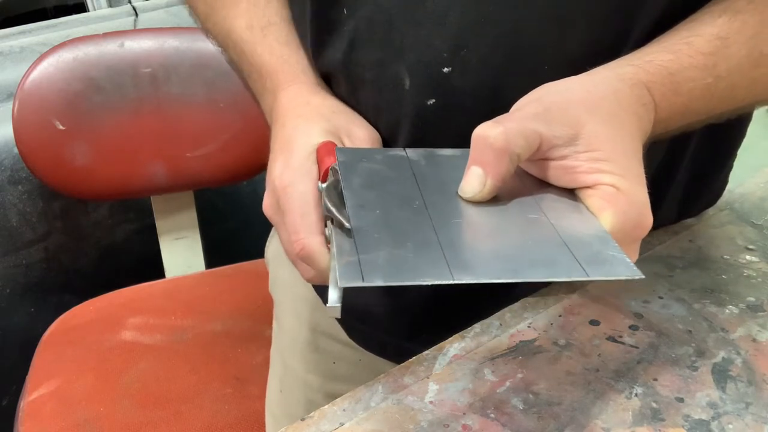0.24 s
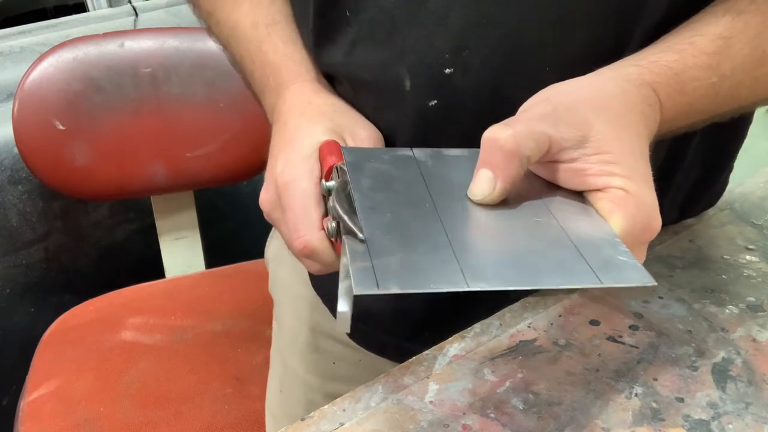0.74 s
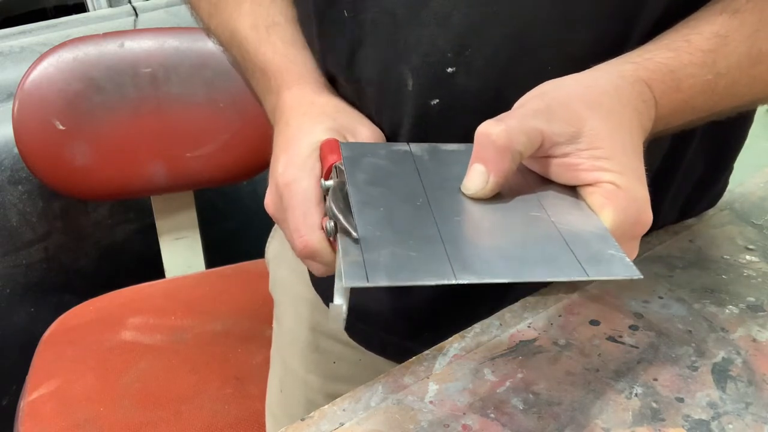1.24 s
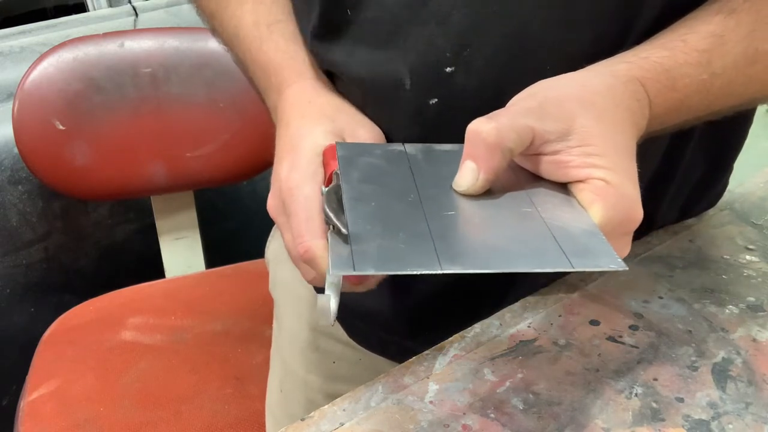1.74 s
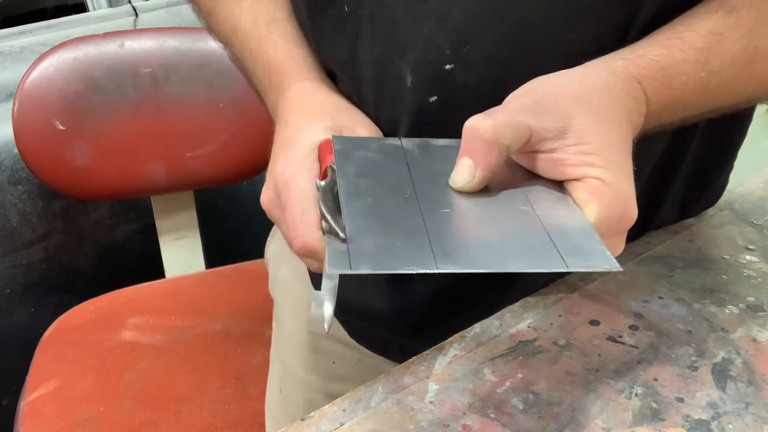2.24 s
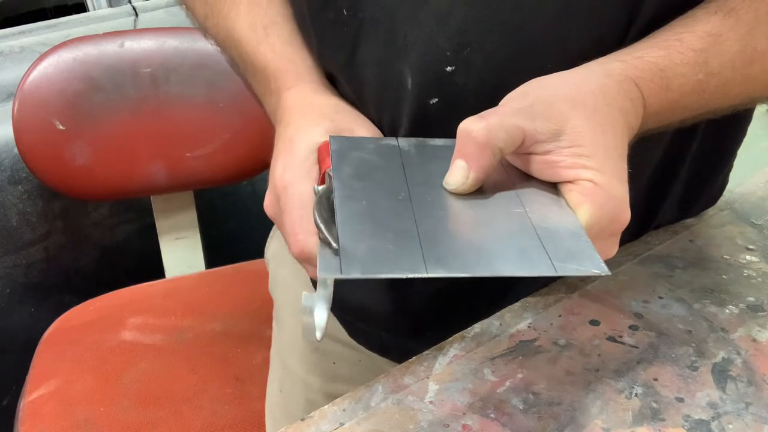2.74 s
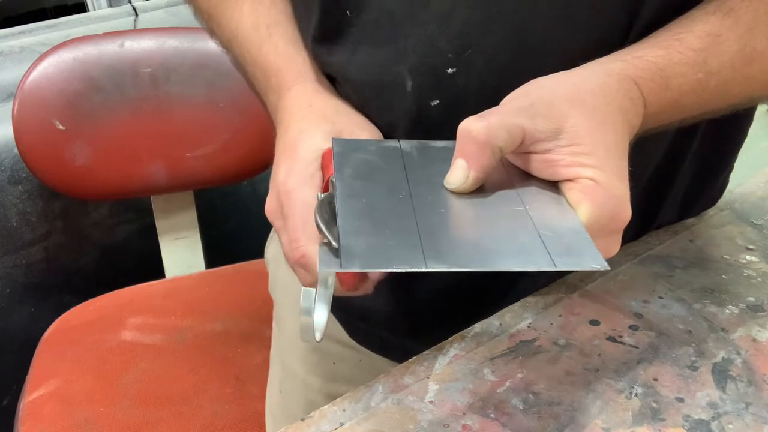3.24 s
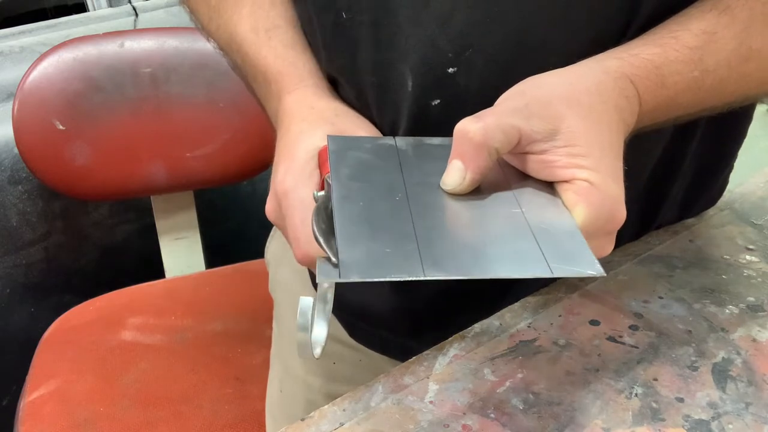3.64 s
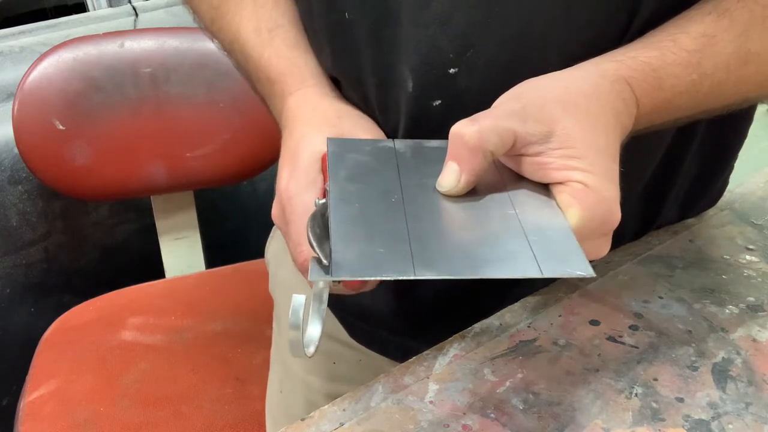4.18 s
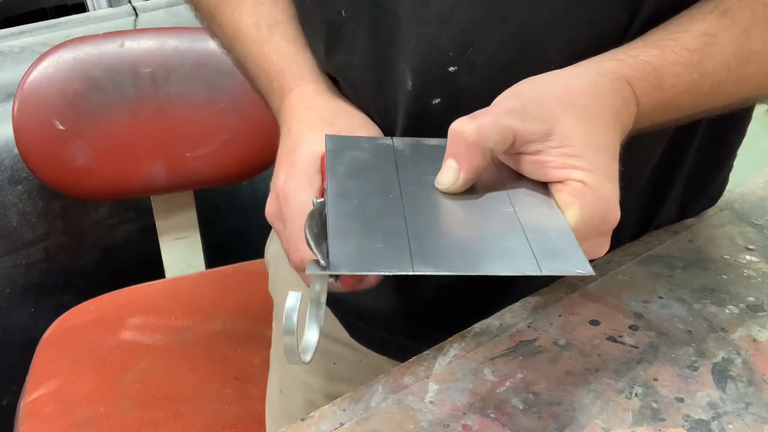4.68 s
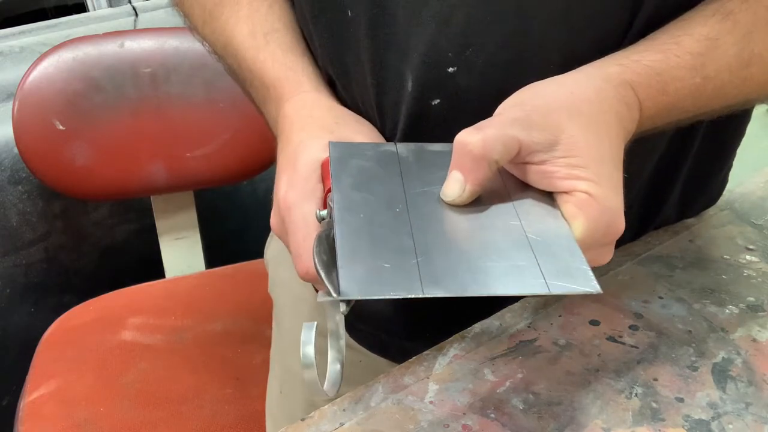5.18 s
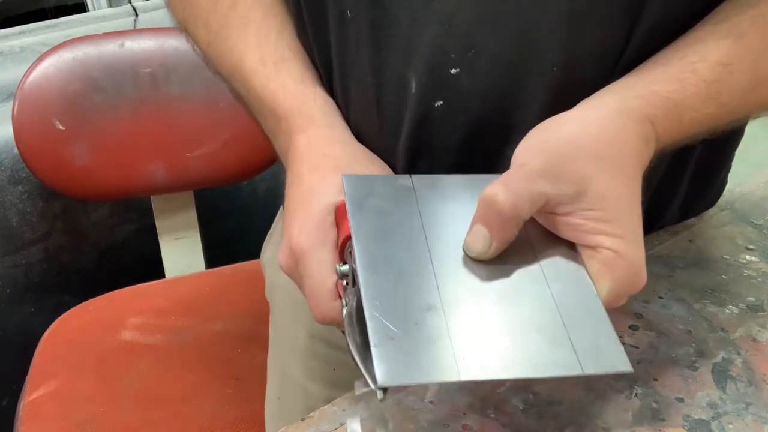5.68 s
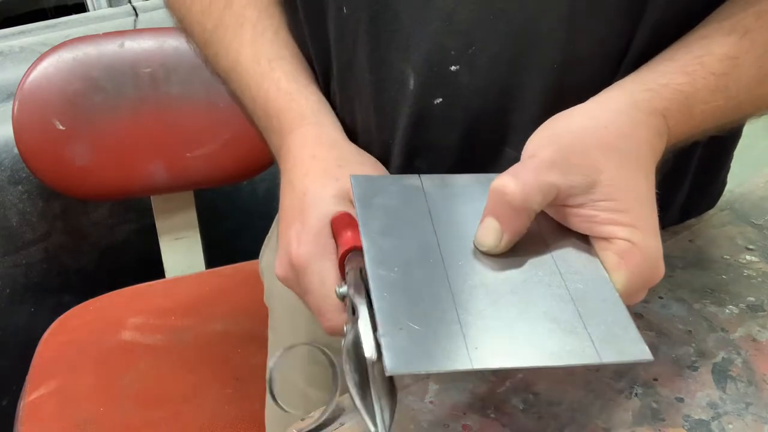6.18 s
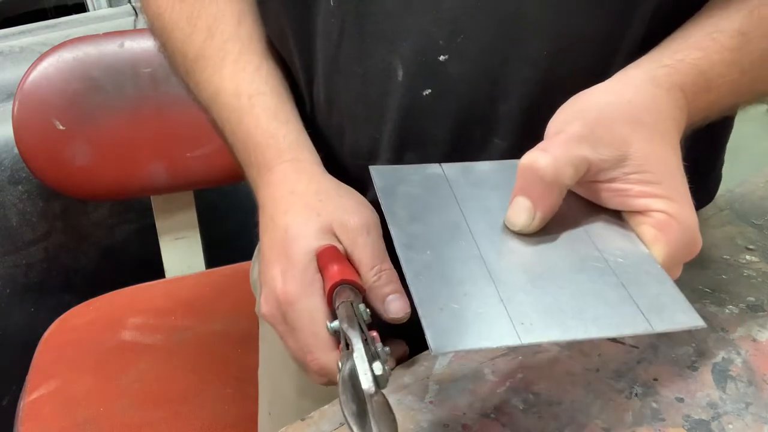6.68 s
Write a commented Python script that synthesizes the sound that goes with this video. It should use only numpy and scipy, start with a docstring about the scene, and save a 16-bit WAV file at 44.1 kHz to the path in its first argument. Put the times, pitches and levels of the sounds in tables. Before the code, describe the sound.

Close stereo microphone, small lively shop with a short reverberation and faint ventilation and machine hum. Regular snipping of sheet metal: a small bite, a crunchy rasping hiss with a thin high squeal, a hard jaw clack, and a fast stuttering scrape along the edge. The final stroke snaps hard; then the freed sheet and curled offcut rub and tap lightly before only the hum remains.

```python
"""A humming workshop, hand snips cutting a strip off a steel sheet close to a two-port microphone.
Each stroke: the blades bite with a tick and shear with a gritty hiss, the jaws rub open and clack,
then judder forward along the cut edge and shake the sheet. The last stroke ends in a loud snap,
then the freed sheet scuffs and taps. Shaped random fractures make the hiss and grind, short noise bursts
the ticks and cracks, decaying modes the ringing; reflections and a tail place the work in the shop."""
import sys
import numpy as np
from scipy import signal
from scipy.fft import rfft, irfft, next_fast_len
from scipy.io import wavfile
from scipy.ndimage import uniform_filter1d

SR = 44100
rng = np.random.default_rng(int(sys.argv[2]) if len(sys.argv) > 2 else 0)


def store_pcm(level_fs):
    """Save levels as 16-bit WAV."""
    pcm = np.round(np.clip(level_fs, -1, 1) * 32767).astype(np.int16)
    wavfile.write(sys.argv[1], SR, np.atleast_2d(pcm).T)


N = 305172
TIME = np.arange(N) / SR  # seconds
# Levels in the tables are relative: each function trims its layers, and the room and recorder follow.


def amp(db):
    """Decibels to gain."""
    return 10 ** (np.asarray(db) / 20)


def unit(x):
    """Scales to rms 1."""
    return x / np.sqrt(np.mean(x ** 2) + 1e-20)


def read(points, hz):
    """Reads a table of (Hz, value) on a log-frequency axis."""
    f, value = np.transpose(points)
    return np.interp(np.log(hz + 1), np.log(f + 1), value)


def add(mix, s, sound):
    """Mixes a sound in at time s, in seconds."""
    part = mix[max(round(s * SR), 0):][:len(sound)]
    part += sound[:len(part)]


def colour(x, spectrum, size=2048):
    """Causal minimum-phase filter of unit energy with the given spectrum."""
    log_gain = np.log(amp(read(spectrum, abs(np.fft.fftfreq(size, 1 / SR)))))
    taps = np.fft.ifft(np.exp(np.conj(signal.hilbert(log_gain)))).real[:size // 2]
    return signal.oaconvolve(x, taps / np.linalg.norm(taps))[:len(x)]


def drift(rate):
    """Smooth random motion of rms 1: noise under a Gaussian low-pass of the given rate in Hz."""
    hz = np.fft.rfftfreq(N, 1 / SR)
    return unit(irfft(rfft(rng.standard_normal(N)) * np.exp(-(hz / rate) ** 2), N))


def resonate(x, hz, width_hz):
    """A resonance that follows the curve hz: shift down, smooth, shift back up."""
    turn = np.exp(2j * np.pi * np.cumsum(hz) / SR)
    r = np.exp(-np.pi * width_hz / SR)
    return unit((turn * signal.lfilter([1 - r], [1, -r], x / turn)).real)


def grit(per_s, spread_db):
    """Tiny fractures at random moments, their sizes scattered by an exponential draw in dB."""
    size = amp(spread_db * np.minimum(rng.exponential(1, N), 4))
    return unit(size * rng.choice([-1, 1], N) * (rng.random(N) < per_s / SR))


def pings(per_s, ring_s, glide, size=560, count=14000):
    """Micro-slips along the blade: each sings for a few milliseconds at its own gliding pitch."""
    where, pitch, bend, keep = rng.random((count, 4)).T
    live = keep < per_s * N / SR / count
    t = np.arange(size) / SR
    hz = (2000 + 14000 * pitch[live, None]) * (1 + glide * (bend[live, None] - .5) * t / t[-1])
    waves = t * np.exp(-t / ring_s) * np.sin((2 * np.pi * hz * t).astype(np.float32))
    at = (where[live, None] * N).astype(int) + np.arange(size)
    return unit(np.bincount(at.ravel(), waves.ravel(), N)[:N])


def contacts(times, levels_db, rise, decay, size=1024):
    """Metal meets metal: a burst of micro-impacts; rise and decay are time constants in seconds."""
    out, t = np.zeros(N), np.arange(size) / SR
    shape = (1 - np.exp(-t / rise)) * np.exp(-t / decay)
    for s, db in zip(times, levels_db):
        burst = shape * rng.standard_normal(size)
        add(out, s, amp(db) * unit(burst) * np.sqrt(SR * decay / size))
    return out


def ringing(times, levels_db, modes, scatter_db, detune, rise, tilt_db=0, wander=0, size=6144):
    """Each blow rings the modes a little differently; the balance gains tilt_db an octave over the scene."""
    out, t = np.zeros(N), np.arange(size) / SR
    hz, mode_db, t60 = np.transpose(modes)[:, :, None]
    grip = rng.random(hz.shape)
    for s, db in zip(times, levels_db):
        strength, shift, phase = rng.standard_normal((len(modes), 3)).T[:, :, None]
        tilt = tilt_db * (s * SR / N - .5) * np.log2(hz / hz.mean())
        weight = amp(mode_db + scatter_db * strength + tilt)
        # grip and slot change from stroke to stroke and pull each mode its own way
        pitch = hz * (1 + detune * shift + wander * np.sin(2 * s + 2 * np.pi * grip))
        waves = np.sin(2 * np.pi * (pitch * t + phase)) * np.exp(-np.log(1000) * t / t60)
        blow = (weight * waves).sum(0) / np.linalg.norm(weight)
        add(out, s, amp(db) * blow * (1 - np.exp(-t / rise)))
    return out


# Likeness of diffuse sound at the two ports. Each row: frequency in Hz, likeness from 0 to 1.
LIKENESS = [(60, 0.83), (150, 0.83), (300, 0.74), (700, 0.08), (3000, 0), (4500, 0.06), (6300, 0.1),
            (7500, 1), (9500, 0.98), (14000, 0.7)]
# Microphone ports, for all sound but the machine hum and the low bumps.
# Each row: frequency in Hz, left's phase lead in radians.
PORT_LEAD = [(1000, .1), (2100, .9), (2700, 2.6), (3400, 2.3), (4000, 1.2), (4700, 1.6), (5500, 2.6),
             (7500, .1), (8400, -1), (9500, -3.1), (11300, -6.3), (13200, -9.4), (14700, -12.5),
             (16000, -13.6)]


def diffuse(a, b, hz):
    """Two unrelated spectra become the partly alike pair that the ports pick up."""
    same = np.clip(read(LIKENESS, hz), 0, 1)
    left = a * np.exp(1j * read(PORT_LEAD, hz))
    return np.array([left, same * a + np.sqrt(1 - same ** 2) * b])


# Spectrum of the ventilation noise. Each row: frequency in Hz, relative level in dB.
AIR_SPECTRUM = [(15, -63), (24, -33), (40, -14.5), (100, -5), (170, -14), (250, -15.5), (310, -17.5),
                (400, -15), (520, -25), (800, -26.5), (1300, -28), (2000, -37), (5700, -43.5), (12000, -48),
                (16000, -53)]
# Machinery hum. Each row: frequency in Hz, relative level in dB.
HUM_TONES = [(47.3, -56), (71, -60), (94.6, -51.5), (118, -56), (172, -67)]


def background(air_db=-46.0, hum_db=-.5, waver=0.5):
    """Ventilation noise and the hum of a machine, whose tones waver in level and phase."""
    hz = np.fft.rfftfreq(N, 1 / SR)
    pair = diffuse(*rfft(rng.standard_normal((2, N))), hz)
    air = irfft(pair * amp(read(AIR_SPECTRUM, hz)), N)
    hum = np.zeros(N)
    for f, db in HUM_TONES:
        strength = amp(db + hum_db) * np.sqrt(2) * (1 + waver * drift(rate=4.5))
        hum += strength * np.sin(2 * np.pi * f * TIME + 0.53 * drift(rate=1.2))
    return (amp(air_db) * unit(air) + hum) * amp([[-.7], [.7]])  # left a little softer than right


def reflections(t60s, delay, size=32768):
    """A two-channel noise tail of unit energy, each band dying at its own speed."""
    hz, t, z = signal.stft(rng.standard_normal((2, size)), SR, nperseg=128)
    decay = np.exp(-np.log(1000) * t / read(t60s, hz)[:, None])
    tail = signal.istft(z * decay, SR, nperseg=128)[1]
    tail[:, :round(delay * SR)] = 0
    return tail / np.linalg.norm(tail, axis=1, keepdims=True)


# Balance of the ports. Each row: frequency in Hz, left over right in dB.
PORT_BALANCE = [(300, 3.5), (1200, 2), (3000, -0.5), (5200, 3), (7000, 0)]
# Reflections off bench and sheet. Each row: frequency in Hz, relative level in dB.
NEAR_SPECTRUM = [(200, -20), (600, -3.5), (1400, 0), (2100, -2), (3000, -6), (4600, -3), (7500, -5),
                 (14000, -7.5)]
# Workshop reverberation. Each row: frequency in Hz, time to fall 60 dB in seconds.
SHOP_T60 = [(300, 0.06), (1500, 0.5), (5000, 0.45), (10000, 0.31), (15000, 0.081)]


def space(x, near_db=-1, shop_db=-14):
    """Direct sound at the two ports, quick reflections off the work, and the workshop's tail."""
    size = next_fast_len(N + SR)
    hz = np.fft.rfftfreq(size, 1 / SR)
    direct = np.array([np.exp(1j * read(PORT_LEAD, hz)), np.ones(len(hz))])
    near_tail = reflections([(1000, .028)], delay=.0006)  # dies 60 dB in 28 ms at every frequency
    near = amp(near_db + read(NEAR_SPECTRUM, hz)) * rfft(near_tail, size)
    shop = amp(shop_db) * rfft(reflections(SHOP_T60, delay=0.0091), size)
    balance = amp(np.outer([.5, -.5], read(PORT_BALANCE, hz)))
    return irfft(rfft(x, size) * (direct + diffuse(*(near + shop), hz)) * balance, size)[:, :N]


# Soft low knocks of the hands. Each row: centre in seconds, level in dB, pitch in Hz, half-length in seconds.
HAND_BUMPS = [(2.439, -36.5, 71.5, 0.024), (6.322, -18, 99, 0.007), (6.361, -29.5, 114, 0.015)]


def bumps():
    """The hands shift their grip and settle with a dull, low push: a sine under a Gaussian swell."""
    out = np.zeros(N)
    for s, db, hz, width in HAND_BUMPS:
        t = TIME - s
        out -= amp(db) * np.exp(-(t / width) ** 2 / 2) * np.sin(2 * np.pi * hz * t)
    return out


# The freed sheet scuffs on hand and tool. Each row: start in seconds, length in seconds,
# rub level in dB, ring of the sheet in dB.
SHEET_SCUFFS = [(5.765, 0.22, -48.5, -62), (5.885, 0.15, -43, -59), (5.985, 0.11, -40, -42),
                (6.183, 0.17, -54, -54), (6.563, 0.14, -59.5, -80), (6.816, 0.084, -73, -51)]
# Light taps of the loose offcut landing on the lap, and of the sheet in the hand. Each row: start in seconds,
# tick level in dB, ring level in dB, ring pitch in Hz.
OFFCUT_TAPS = [(5.775, -24, -31, 986), (5.912, -32, -29.5, 1900), (5.943, -51, -29, 4430),
               (5.991, -26.5, -31, 2210), (6.003, -32, -23.5, 3230), (6.015, -26.5, -30, 1970),
               (6.027, -32, -23, 2620), (6.2, -49, -40, 1320), (6.234, -45, -34.5, 2460),
               (6.268, -51, -37, 1240), (6.287, -54, -45, 2910), (6.825, -55.5, -35, 1344)]
# Modes of the hand-damped sheet, also shaken by judder().
# Each row: frequency in Hz, relative level in dB, time to fall 60 dB in seconds.
SHEET_MODES = [(434, -9.5, 0.051), (677, -7.5, 0.12), (780, -10.5, 0.043), (942, -18, 0.05),
               (1055, -10.5, 0.039), (1157, -6.5, 0.05), (1240, -4, 0.022), (1395, 5, 0.032),
               (1526, 0, 0.094), (1600, -5.5, 0.034), (1890, -15, 0.031), (2090, -16, 0.023),
               (2510, -12, 0.013)]
# Spectrum of rubbing steel, also in judder(). Each row: frequency in Hz, relative level in dB.
RUB_SPECTRUM = [(300, 0), (800, -5.5), (1400, -0.5), (2800, 6), (4500, -1), (8000, -10), (15000, -13)]


def handling(rub_db=3, sheet_db=2, tap_t60=0.038, peak_share=0.17):
    """The freed sheet and the curled offcut rub on hand and tool, and the offcut taps as it lands on the lap."""
    rub, shake = np.zeros((2, N))
    for start, length, db, ring_db in SHEET_SCUFFS:
        press = np.interp(TIME, start + length * np.array([0, peak_share, 1]), [0, 1, 0])
        rub += amp(db + rub_db) * press
        shake += amp(ring_db + sheet_db) * press
    grains = grit(per_s=900, spread_db=0.5)
    sheet = np.trim_zeros(ringing([0], [0], SHEET_MODES, scatter_db=2.5, detune=0.016, rise=0.00063))
    s, ticks, _, _ = np.transpose(OFFCUT_TAPS)
    out = colour(rub * grains + contacts(s, ticks, rise=0.00026, decay=0.0027), RUB_SPECTRUM)
    out += signal.oaconvolve(shake * grains, sheet / np.linalg.norm(sheet))[:N]
    for at, _, db, hz in OFFCUT_TAPS:
        modes = [(hz, 0, tap_t60), (hz * 1.2, -6, tap_t60), (hz * 1.8, -10, tap_t60 / 2)]
        out += ringing([at], [db], modes, scatter_db=-0.5, detune=0.0025, rise=0.0013)
    return out


# The jaw judders along the cut edge. Each row: start in seconds, basic gap between slips in seconds,
# number of slips, share by which the last one comes later, crack level in dB, ring of the sheet in dB.
JUDDER_PUSHES = [(0.018, 0.0082, 9, 0.091, -19, -31.5), (0.8078, 0.0089, 6, 0.14, -20.5, -35),
                 (1.5832, 0.0082, 8, 0.26, -19.5, -31.5), (2.3015, 0.0083, 9, 0.18, -19.5, -32.5),
                 (3.081, 0.0092, 9, 0.19, -20.5, -33.5), (3.8569, 0.011, 9, 0.41, -19.5, -31),
                 (4.643, 0.012, 5, 0.013, -18.5, -29)]
# Single late jolts as the jaw comes to rest. Each row: start in seconds, crack level in dB, ring level in dB.
LATE_JOLTS = [(2.41, -32.5, -57), (4.714, -18, -38), (4.7325, -30, -40)]


def slips(uneven_db=1.5, crack_fade_db=12, shake_fade_db=9.5):
    """Rows (s, crack dB, ring dB): as the push runs out, the slips come later and weaker."""
    rows = []
    for start, gap, count, slowing, crack_db, ring_db in JUDDER_PUSHES:
        k = np.arange(round(count))
        spent = k / k[-1]  # 0 at the first slip, 1 at the last
        chance = uneven_db * rng.standard_normal(len(k))
        times = start + gap * k * (1 + slowing * spent ** 3)
        cracks = crack_db + chance - crack_fade_db * spent
        rings = ring_db + chance / 2 - shake_fade_db * spent
        rows += zip(times, cracks, rings)
    return rows + LATE_JOLTS


def knocks(times, levels_db, hz=1200, swell_s=0.00094, overtone_db=-5, size=1024):
    """A slip flexes the sheet: a few dull cycles that swell and die at once."""
    out, t = np.zeros(N), np.arange(size) / SR
    swell = t / swell_s * np.exp(1 - t / swell_s)
    for s, db in zip(times, levels_db):
        low, high = 2 * np.pi * hz * (1 + 0.076 * rng.standard_normal(2))
        cycles = np.sin(low * t) + amp(overtone_db) * np.sin(1.354 * high * t)
        add(out, s, amp(db) * swell * cycles)
    return out


# Spectrum of a slip's crack. Each row: frequency in Hz, relative level in dB.
CRACK_SPECTRUM = [(300, -7.5), (1200, -0.5), (2300, -2.5), (3000, 5.5), (4000, -3.5), (5400, -2),
                  (8800, -5.5), (10000, -2), (12200, -0.5), (14000, -12), (15700, 3)]


def judder(crack_db=1, ring_db=2.5, knock_db=7, drag_db=-23, lead_s=0.02, drag_s=0.082):
    """Pushed forward, the jaw drags, sticks and slips on the cut edge and shakes the hand-damped sheet."""
    s, cracks, rings = np.transpose(slips())
    drag, t = np.zeros(N), TIME[:SR // 2]
    for start, _, _, _, db, _ in JUDDER_PUSHES:
        add(drag, start - lead_s, amp(db + drag_db) * np.minimum(t / lead_s, 1) * np.exp(-t / drag_s))
    crack = colour(contacts(s, cracks + crack_db, rise=.0008, decay=.001), CRACK_SPECTRUM)
    flex = knocks(s, rings + knock_db)
    scrape = colour(drag * grit(per_s=1700, spread_db=-0.5), RUB_SPECTRUM)
    shake = ringing(s, rings + ring_db, SHEET_MODES, scatter_db=2.5, detune=0.0039, rise=0.00071,
                    tilt_db=6.0, wander=0.031)
    return crack + flex + scrape + shake


# Jaws and linkage catching as they open. Each row: start in seconds, tick level in dB, ring of the snips in dB.
JAW_CLACKS = [(0.7147, -18, -45), (0.7236, -19, -21), (0.7455, -10.5, -18), (1.431, -27, -40),
              (1.495, -16.5, -23.5), (1.521, -12, -17.5), (2.2168, -18, -33), (2.237, -12.5, -18.5),
              (2.933, -31, -38), (2.972, -20, -40), (2.9982, -19, -35), (3.0089, -16, -17),
              (3.04, -12, -18.5), (3.767, -16.5, -26), (3.788, -17.5, -15), (3.8309, -14.5, -18.5),
              (4.5422, -20.5, -20), (4.5686, -14, -16.5)]
# Modes of the snips. Each row: frequency in Hz, relative level in dB, time to fall 60 dB in seconds.
SNIPS_MODES = [(2730, -9.5, 0.022), (3160, -12.5, 0.037), (3710, -20.5, 0.02), (4445, 1.5, 0.02),
               (4540, -11, 0.084), (5170, 1, 0.015), (5740, -3, 0.011)]
# Spectrum of a tick, also in bites(). Each row: frequency in Hz, relative level in dB.
TICK_SPECTRUM = [(300, -37), (1500, -14), (2200, -13), (3000, -2), (4500, -1), (6500, -2.5), (7600, -1),
                 (9300, -4.5), (11800, 0), (13000, 0), (14000, -14), (15700, 5)]


def clacks(tick_db=1.5, ring_db=5, bite=0.37):
    """The jaws catch and let go: a bright tick and the short ring of the tool."""
    s, ticks, rings = np.transpose(JAW_CLACKS)
    tick = colour(contacts(s, ticks + tick_db, rise=0.00027, decay=0.00063), TICK_SPECTRUM)
    rings = rings + bite * (rings - rings.max())  # light catches hardly shake the tool
    return tick + ringing(s, rings + ring_db, SNIPS_MODES, scatter_db=3.5, detune=.012,
                          rise=0.00066, wander=0.01)


# The jaws seat on the sheet before a cut. Each row: start in seconds, tick level in dB, grind level in dB.
JAW_BITES = [(0.2874, -26, -34.5), (1.0894, -23.5, -35.5), (1.838, -29.5, -34.5), (2.5998, -30, -35),
             (3.3655, -33, -36), (4.18, -20, -36), (4.926, -21.5, -33.5)]
# Spectrum of the grind, also in shearing(). Each row: frequency in Hz, relative level in dB.
GRIND_SPECTRUM = [(500, -21), (1500, -10.5), (2100, -14.5), (2800, 1), (3500, -10.5), (4600, -1.5),
                  (5300, 13.5), (6200, -8), (8000, 0), (11000, -19)]


def bites(tick_db=1, grind_db=3, rebound_s=0.0068, rebound_db=1):
    """The edges touch the sheet, rebound and dig in: two gritty ticks."""
    rebounds = [(s + rebound_s, tick + rebound_db, grind + rebound_db) for s, tick, grind in JAW_BITES]
    s, ticks, grinds = np.transpose(JAW_BITES + rebounds)
    tick = colour(contacts(s, ticks + tick_db, rise=0.0015, decay=0.00095), TICK_SPECTRUM)
    return tick + colour(contacts(s, grinds + grind_db, rise=0.0052, decay=0.0018), GRIND_SPECTRUM)


# Dry ticks of the edges seating and of the steel cracking. Each row: start in seconds, level in dB.
DRY_TICKS = [(0.2945, -24), (0.3035, -28), (2.757, -25), (2.839, -28), (3.621, -29), (5.107, -27.5),
             (5.122, -26), (5.132, -32), (5.142, -24), (5.2055, -19), (5.226, -26), (5.2367, -29),
             (5.25, -26.5), (5.341, -27), (5.401, -30), (5.5593, -31), (5.6152, -28.5)]
# Spectrum of the hiss, also in shearing(). Each row: frequency in Hz, relative level in dB.
HISS_SPECTRUM = [(300, -17), (1000, -21), (1500, -7), (2100, -18.5), (3000, -15.5), (4600, -13),
                 (7000, -12), (8500, -3.5), (9200, -8.5), (10600, -2.5), (13000, 1.5), (14200, -2.5),
                 (15700, -6)]


def dry_ticks(tick_db=3):
    """The edges seat and the steel cracks in dry ticks, most often near the end of the sheet."""
    s, db = np.transpose(DRY_TICKS)
    return colour(contacts(s, db + tick_db, rise=0.0005, decay=0.00046), HISS_SPECTRUM)


# Spectrum of the tearing steel. Each row: frequency in Hz, relative level in dB.
TEAR_SPECTRUM = [(300, -20), (900, -16), (1450, 2.5), (2400, -7), (3800, 0.5), (4500, 6), (5600, 3),
                 (6700, -4.5), (7700, 2), (8800, -25), (15000, -21)]
# Spectrum of the jaws slamming shut. Each row: frequency in Hz, relative level in dB.
SNAP_SPECTRUM = [(150, -20), (400, 0.5), (650, -10.5), (1500, -2.5), (2400, -5), (4500, -4), (6500, -10),
                 (8500, 1), (10800, -3.5), (13000, 4.5), (15700, -9)]


def snap(s=5.7408, tear_db=-11.0, tear_s=0.019, growth=0.0059, fall=0.0025, break_db=-6.0):
    """The last bridge of steel tears with growing force, then the jaws slam shut; times in seconds."""
    t = TIME - s
    onset = (1 + np.tanh((t + tear_s) / .0015)) / 2
    swell = np.exp(-np.maximum(-t, 0) / growth - np.maximum(t, 0) / fall) * onset
    tear = amp(tear_db) * swell * grit(per_s=18000, spread_db=-1.0)
    slam = contacts([s], [break_db], rise=.0001, decay=.0028)
    return colour(tear, TEAR_SPECTRUM) + colour(slam, SNAP_SPECTRUM)


def stroke(length, attack, release):
    """Time within one movement of the blades, and its attack-hold-release envelope."""
    t = np.arange(0, length + .05, 1 / SR)
    return t, np.minimum(t / attack, 1) * np.exp(-np.maximum(t - length, 0) / release)


# The blades close through the steel. Each row: start in seconds, length in seconds, hiss level in dB,
# share of the stroke (0 to 1) at the hardest squeeze, easing in dB one stroke length away from it,
# centre of the squeal in Hz.
CLOSING_CUTS = [(0.337, 0.23, -34.5, 0.38, 11.5, 13600), (1.125, 0.21, -33.5, 0.4, 12.5, 13500),
                (1.872, 0.18, -32.5, 0.71, 8, 11300), (2.621, 0.21, -31, 0.75, 18.5, 11700),
                (3.355, 0.25, -31, 0.68, 18.5, 10900), (4.195, 0.18, -33, 0.56, 14, 11970),
                (4.938, 0.21, -32, 0.4, 28, 11200), (5.225, 0.46, -36.5, 0.06, 20.5, 11550)]
# The blades rub open. Each row: start in seconds, length in seconds, hiss level in dB, centre of the squeal in Hz.
RUBBING_OPENINGS = [(0.665, 0.041, -29.5, 13100), (1.429, 0.067, -29, 13300), (2.146, 0.053, -28.5, 13900),
                    (2.93, 0.053, -28.5, 12100), (3.714, 0.043, -30, 12100), (4.475, 0.076, -27, 12160)]
CUT_ATTACK_S, CUT_RELEASE_S = 0.016, 0.0086
GRIND_DB, GRIND_GROWTH_DB = -9, 2.5  # grind against hiss, and its growth from start to end of a cut
CHATTER_HZ, CHATTER_PER_S = 125, 1.3  # mean stick-slip rate, and how fast its depth (0-1) grows in a cut
OPEN_ATTACK_S, OPEN_RELEASE_S, OPEN_FADE_DB_PER_S, OPEN_GRIND_DB = 0.0033, 0.0046, 221, -11.5


def effort(unsteady=0.1534, roundness=1.48):
    """Hiss and grind strength: a cut swells to its hardest squeeze and chatters; an opening's hiss fades."""
    hiss, grind = np.zeros((2, N))
    slip = np.cos(2 * np.pi * np.cumsum(CHATTER_HZ * (1 + unsteady * drift(rate=40))) / SR)
    for start, length, db, hardest, easing_db, _ in CLOSING_CUTS:
        t, gate = stroke(length, CUT_ATTACK_S, CUT_RELEASE_S)
        chatter = 1 + np.minimum(CHATTER_PER_S * t, 1) * np.interp(start + t, TIME, slip)
        force = gate * chatter * amp(db - easing_db * abs(t / length - hardest) ** roundness)
        add(hiss, start, force)
        add(grind, start, force * amp(GRIND_DB + GRIND_GROWTH_DB * (t / length - 1.5)))
    for start, length, db, _ in RUBBING_OPENINGS:
        t, gate = stroke(length, OPEN_ATTACK_S, OPEN_RELEASE_S)
        add(hiss, start, gate * amp(db - OPEN_FADE_DB_PER_S * t))
        add(grind, start, gate * amp(db + OPEN_GRIND_DB))
    return hiss, grind


# Resonances of blade and strip as a stroke starts.
# Each row: central frequency in Hz, relative level in dB, width in Hz (doubled in the second pass).
RASP_RESONANCES = [(1385, -7, 180), (3450, -7.5, 320), (4466, -2, 170), (5550, 0.5, 310), (7960, -0.5, 520)]


def rasping(stroke_index, travel, glide_per_s=0.21, spread=0.12, wobble=0.033, patchy_db=4.0):
    """Coarse grit rings blade and strip; each resonance sits anew at every stroke, glides up and flares."""
    out = np.zeros(N)
    for hz, db, width in RASP_RESONANCES:
        seat = spread * rng.uniform(-0.84, 1, stroke_index.max() + 1)[stroke_index]
        pitch = hz * (1 + seat + glide_per_s * travel + wobble * drift(rate=24))
        flare = amp(db + patchy_db * drift(rate=35))
        once = resonate(grit(per_s=2500, spread_db=4), pitch, width)
        out += flare * resonate(once, pitch, 2 * width)
    return unit(out)


def shearing(hiss_db=-2, squeal_db=-8, grind_db=-6, rasp_db=0, flutter_db=1, crunch_db=2.5,
             comb=0.1, lag_s=0.001143, shorten=0.63):
    """Steel parts in tiny fractures and singing slips; the rubbing blades add a wandering squeal."""
    hiss, grind = effort()
    starts, hz = np.transpose(sorted((row[0], row[-1]) for row in CLOSING_CUTS + RUBBING_OPENINGS))
    current = np.maximum(np.searchsorted(starts, TIME) - 1, 0)
    travel = TIME - starts[current]  # seconds since the stroke began
    pitch = hz[current] * (1 + 0.071 * drift(rate=11.5))
    squeal = resonate(grit(per_s=3900, spread_db=11.0), pitch, width_hz=630)
    squeal = resonate(squeal, pitch, width_hz=700)
    friction = grit(per_s=5500, spread_db=3.5) + .8 * pings(per_s=1900, ring_s=.003, glide=.02)
    # the echo from the blade tips comes sooner as the cutting point runs towards them: the colour glides up
    echo = np.interp(TIME - lag_s * np.exp(-shorten * travel), TIME, friction)
    friction = unit(friction + comb * echo)
    fizz = colour(friction, HISS_SPECTRUM)
    body = colour(friction, GRIND_SPECTRUM) * amp(crunch_db * drift(rate=45))
    sound = hiss * (amp(hiss_db) * fizz + amp(squeal_db) * squeal)
    sound += grind * (amp(grind_db) * body + amp(rasp_db) * rasping(current, travel))
    return sound * amp(flutter_db * drift(rate=26))


def scene():
    """The work in its room, with the low bumps and the background added."""
    work = bites() + shearing() + clacks() + judder() + dry_ticks() + snap() + handling()
    return space(work) + bumps() + background()


def record(dry, threshold_db=-22, slope=0.71, recovery_db=35, cutoff_hz=15850):
    """Gain control ducks after loud blows and recovers, peaks are rounded off, then the treble is cut."""
    power_db = 10 * np.log10(abs(uniform_filter1d((dry ** 2).mean(0), size=400)) + 1e-12)
    fall = TIME * recovery_db  # the held peak sinks by this many dB a second
    held_db = np.maximum.accumulate(power_db + fall) - fall
    over_db = np.maximum(held_db - threshold_db, 0)
    r = np.exp(-1 / (0.0061 * SR))  # the gain moves with a 6.1 ms time constant
    ducked = dry / amp(slope * signal.lfilter([1 - r], [1, -r], over_db))
    rounded = .85 * np.tanh(ducked / .85)
    low_pass = signal.firwin(401, cutoff_hz, window=("kaiser", 8), fs=SR)
    return signal.oaconvolve(rounded, low_pass[None], "same")


dry = scene()
out = record(dry)
store_pcm(out)
```